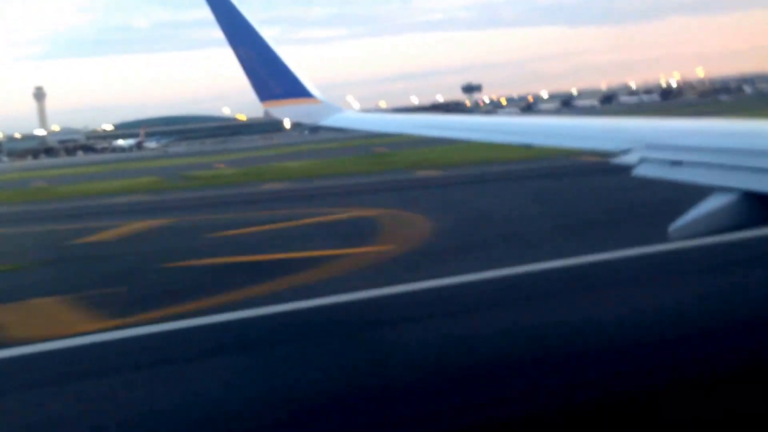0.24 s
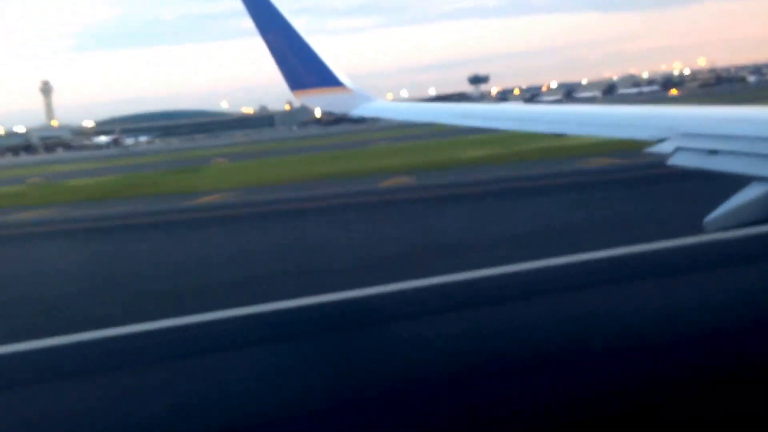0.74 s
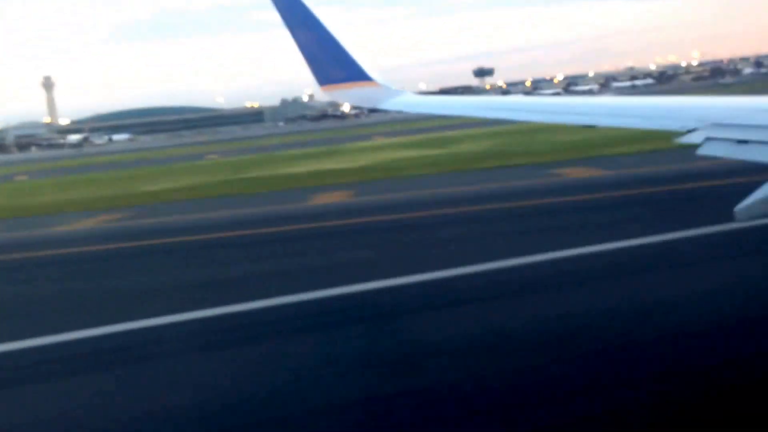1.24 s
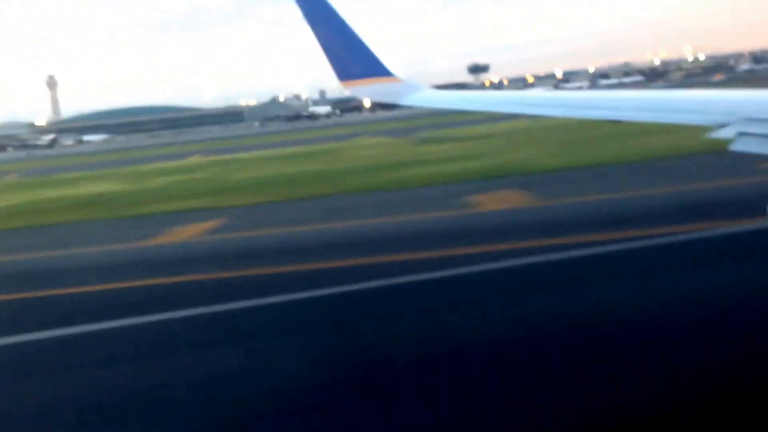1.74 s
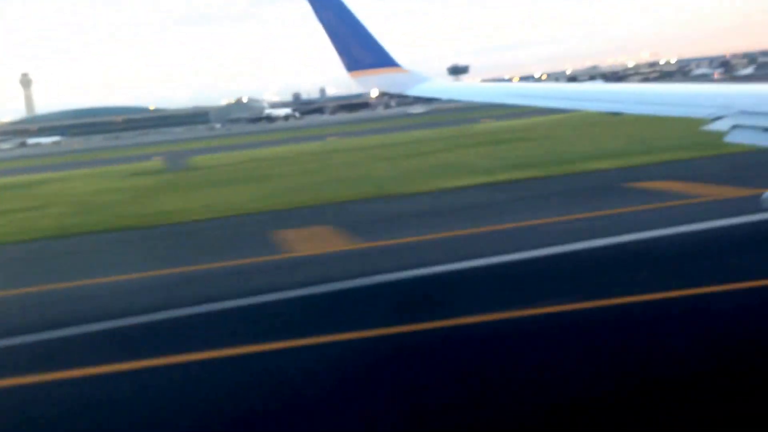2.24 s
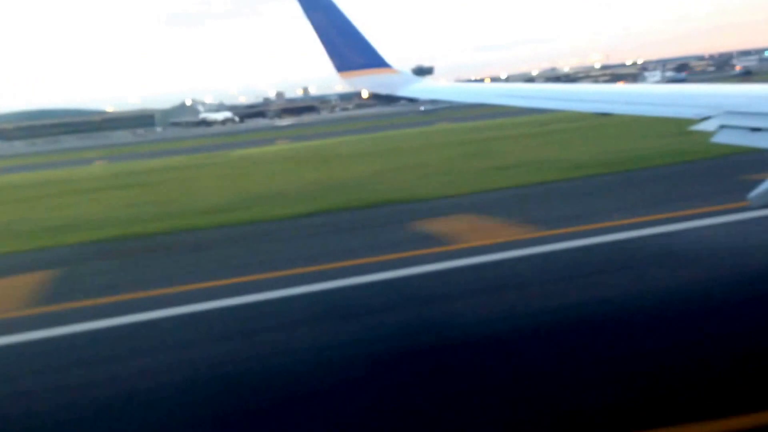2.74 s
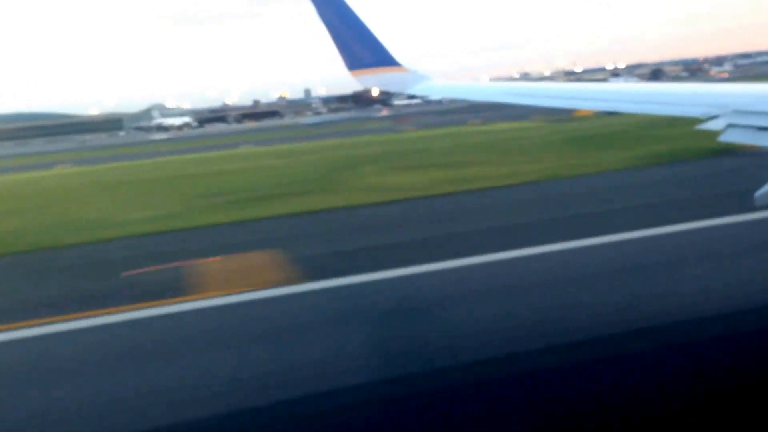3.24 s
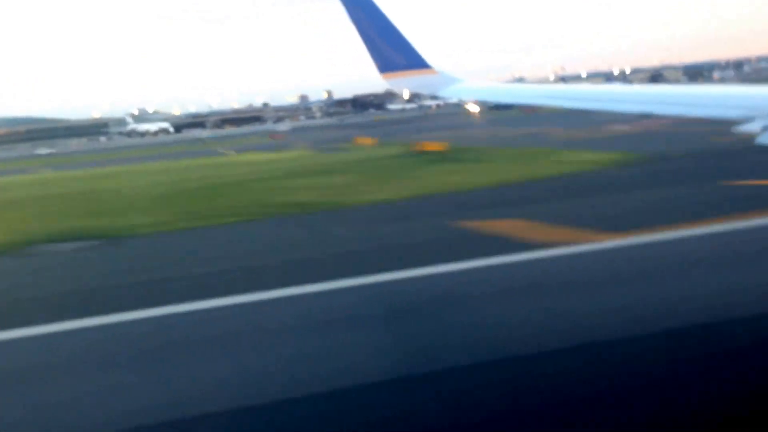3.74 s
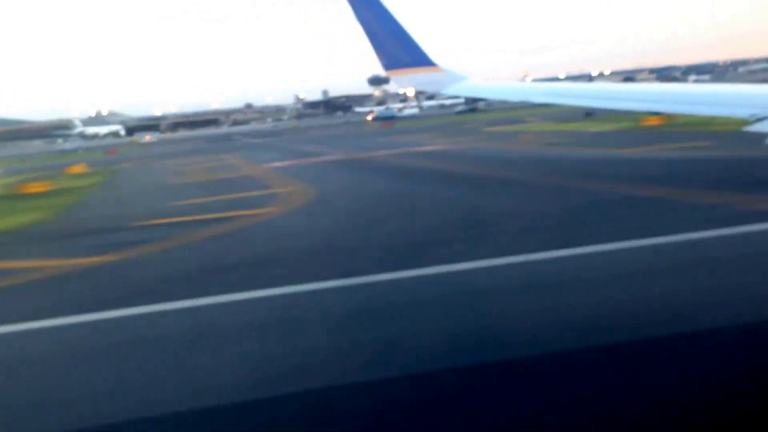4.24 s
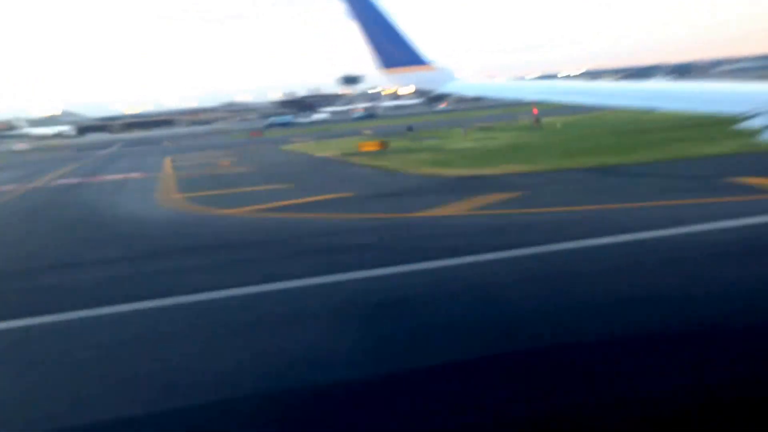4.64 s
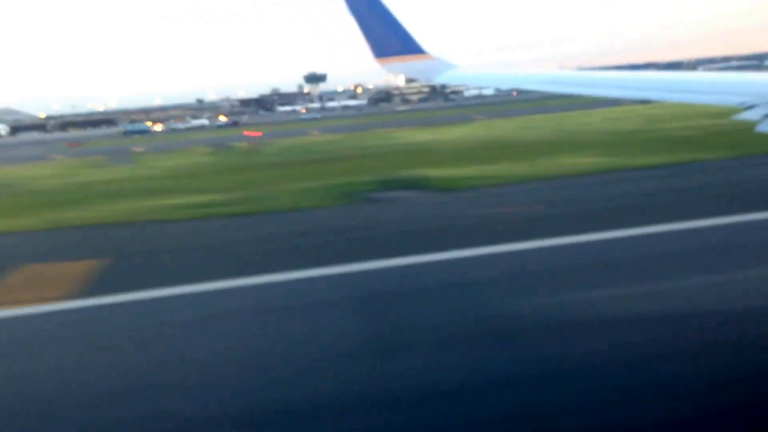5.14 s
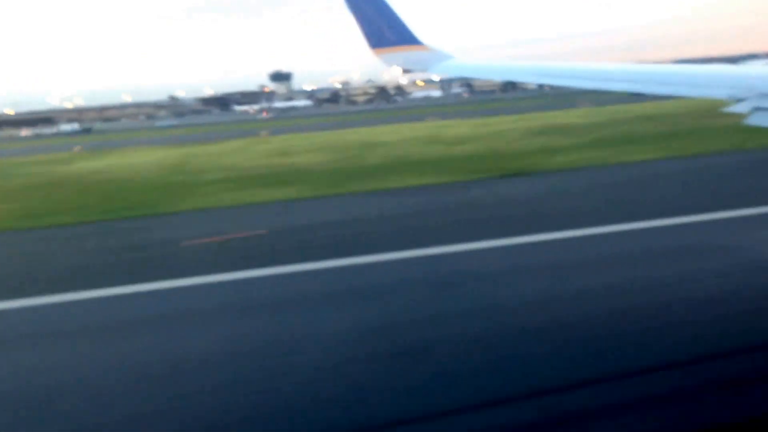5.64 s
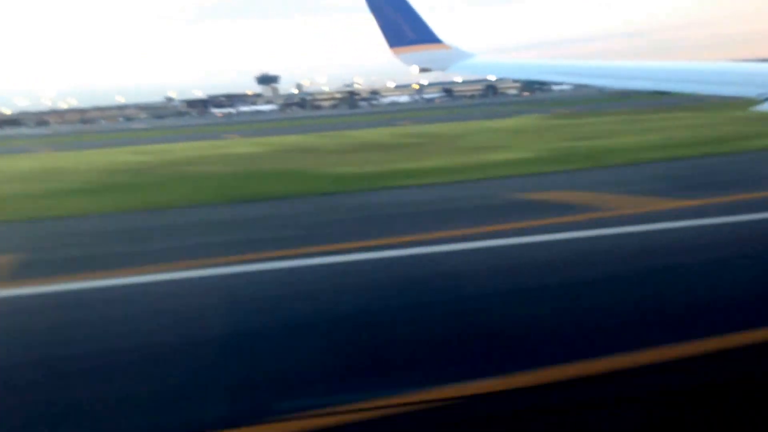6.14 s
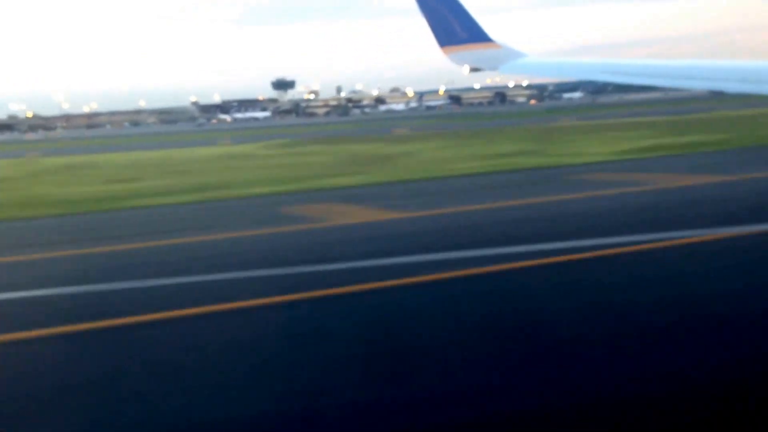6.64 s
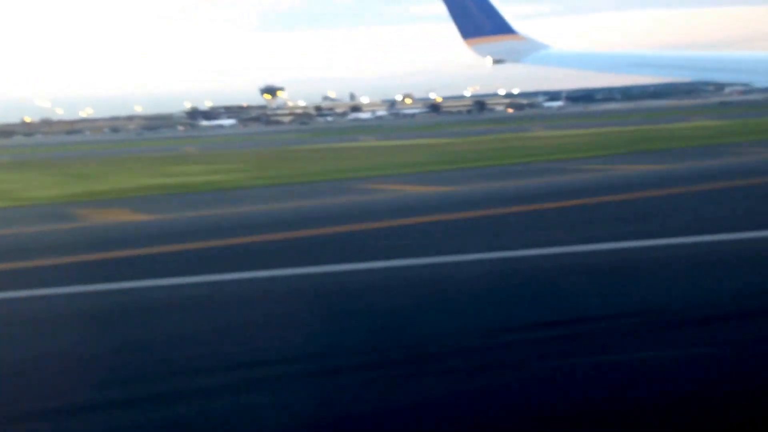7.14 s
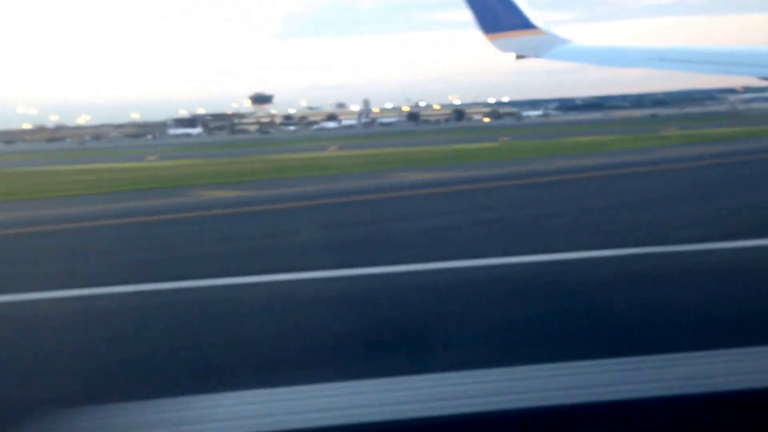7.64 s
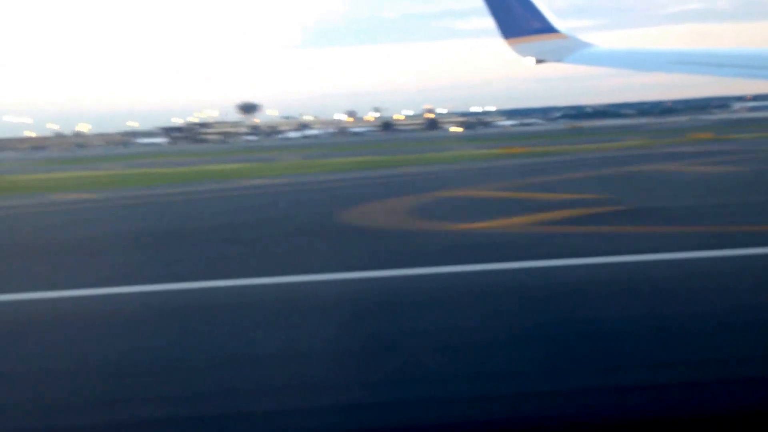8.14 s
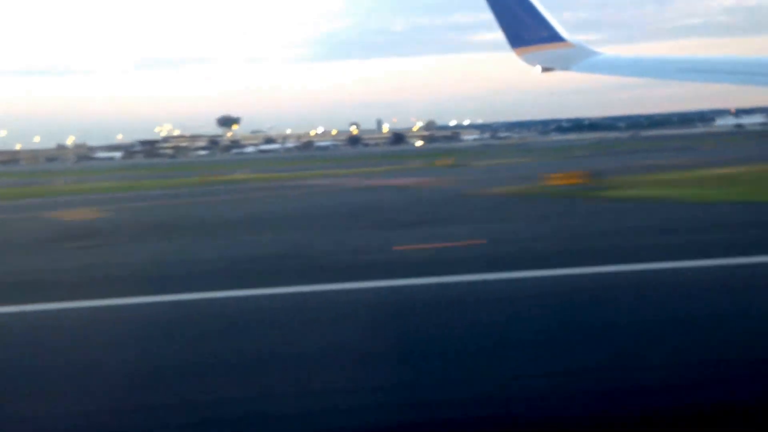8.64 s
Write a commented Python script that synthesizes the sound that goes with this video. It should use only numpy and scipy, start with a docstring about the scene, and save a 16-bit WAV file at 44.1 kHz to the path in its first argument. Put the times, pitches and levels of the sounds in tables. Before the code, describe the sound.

Inside an airliner cabin speeding down the runway, a massive low rumble stays at full loudness throughout, fluttering unevenly. A hollow low-mid drone swells and fades inside it. Well beneath lies a thin trembling air hiss with buzzing plastic trim, short rattles, dry ticks and occasional woody knocks. Handheld microphone by the window, close walls, the loud low end squashed at its limit.

```python
"""A deep, fluttering rumble under a hiss of air: an airliner's takeoff roll from a window seat behind the wing.
Exhaust and wheel noise is filtered noise shaped by cabin resonances, with one resonance ringing as a sine.
The air is trembling noise; loose plastic trim chatters, rattles and ticks in short bursts of noise.
Knocks are damped sines with a noisy clack; a fast limiter holds the loud rumble at full scale."""
import sys
import numpy as np
from scipy import signal
from scipy.fft import rfft, irfft, next_fast_len
from scipy.io import wavfile
from scipy.ndimage import uniform_filter1d, minimum_filter1d, map_coordinates

SR = 44100
rng = np.random.default_rng(int(sys.argv[2]) if len(sys.argv) > 2 else 0)


def generate_wav(signal):
    """Clip the signal to [-1, 1] and save it as 16-bit WAV at the path in sys.argv[1]."""
    frames = np.transpose(np.atleast_2d(signal))
    scaled = np.clip(frames, -1, 1) * 32767
    pcm = np.round(scaled).astype(np.int16)
    wavfile.write(sys.argv[1], SR, pcm)


N = 392490
TOP_HZ = 15600  # upper band limit

# contact between trim panels: freq_hz, density_db (per Hz)
PLASTIC_SPECTRUM = [(400, -21.5), (1200, 4), (2600, 6), (3700, 0.5), (5300, -3), (6200, -5), (7600, -14),
                    (9500, -19.5), (15000, -26.5)]
# shaking of the cabin by airflow and runway: time_s, hiss_db, fizz_db (before each layer's trim)
SHAKE_LEVELS = [(0.0, -45, -67.5), (0.19, -50.5, -68.5), (0.34, -50, -72.5), (1.13, -48.5, -69.5),
                (1.43, -49, -72.5), (2.0, -47, -66.5), (2.59, -47, -69), (2.86, -50.5, -69.5),
                (3.35, -47.5, -71.5), (4.49, -48.5, -70.5), (4.98, -51, -72.5), (5.47, -47, -69.5),
                (6.01, -50, -66), (6.46, -48, -69), (7.64, -48, -65.5), (7.81, -50, -69.5),
                (8.23, -52.5, -69), (8.85, -50, -69)]


def amp(db):
    """Decibels to gain."""
    return 10 ** (np.asarray(db) / 20)


def unit(x):
    """x at rms 1."""
    return x / np.sqrt(np.mean(x ** 2) + 1e-20)


def along(points, hz):
    """(Hz, value) points interpolated on a log frequency axis."""
    point_hz, values = np.transpose(points)
    return np.interp(np.log(hz + 1), np.log(point_hz), values)


def curves(rows):
    """One value per sample for each column after the time."""
    time_s, *columns = np.transpose(rows)
    return [np.interp(np.arange(N) / SR, time_s, column) for column in columns]


def wobble(rate_hz):
    """Smooth random curve with rate_hz knots a second."""
    knots = rng.standard_normal(int(N * rate_hz / SR) + 4)
    return map_coordinates(knots, [np.arange(N) * rate_hz / SR], mode="nearest")


def filtered(x, response):
    """x filtered by a function of frequency."""
    size = next_fast_len(len(x) + 8192)  # padded for the filter's tail
    spectrum = rfft(x, size) * response(np.fft.rfftfreq(size, 1 / SR))
    return irfft(spectrum, size)[:len(x)]


def noise(response):
    """Noise of rms 1 with the given response."""
    return unit(filtered(rng.standard_normal(N), response))


def add(track, start_s, sound):
    """Mix a sound into the track at start_s."""
    part = track[max(round(start_s * SR), 0):][:len(sound)]
    part += sound[:len(part)]


def in_cabin(spectrum, hz):
    """Gain of a spectrum lifted by the cabin and panel resonances."""
    # centre_hz, width_hz (full, at half the dB lift), lift_db
    resonances = [(101, 28, 2.5), (129, 5.3, 1.5), (158, 18, 2.5), (334, 66, 2.5), (438.7, 65, 4.5),
                  (619, 77, 6.5), (800, 31, 5.5), (1517, 180, 4.5), (2050, 290, 0.5), (2500, 91, 2),
                  (2870, 140, 0.5), (3000, 97, 1), (3500, 150, 2)]
    lift_db = sum(db * 2 ** -(2 * (hz - centre) / width) ** 2 for centre, width, db in resonances)
    return amp(along(spectrum, hz) + lift_db)


def near_walls(x):
    """Quick echoes from hard surfaces close by comb the sound."""
    # window pane, wall and seat back: delay_s, level_db
    echoes = [(.0029, -21), (.0063, -19), (.0104, -19), (.0141, -22)]
    return filtered(x, lambda hz: 1 + sum(
        amp(db) * np.exp(-2j * np.pi * hz * delay_s) for delay_s, db in echoes))


def air(jolts, air_db=-0.5, sheen_db=-14, sheen_fade_db_per_s=0.9, fizz_db=-3, tremble_db=1.7, jolt_db=1.5):
    """Hiss of the airflow, trembling with the airframe, with a fading sheen and a fine fizz on top."""
    # air along the skin and from the vents: freq_hz, density_db (per Hz)
    air_spectrum = [(300, -22.5), (900, 0.5), (1300, -2.5), (2100, 3.5), (3100, -6), (4500, -6.5),
                    (5200, -12), (6000, -23.5), (7400, -40), (15000, -57.5)]
    sheen_spectrum = [(4400, -37), (5400, 3.0), (6100, 0.0), (6900, -4), (7600, -17.0), (9000, -46.0)]
    fizz_spectrum = [(5000, -24.5), (7400, 1.5), (8700, 4.0), (11000, -4.5), (15000, -8.0)]
    hiss_level_db, fizz_level_db = curves(SHAKE_LEVELS)
    sheen_level_db = hiss_level_db - sheen_fade_db_per_s * np.arange(N) / SR
    hiss = amp(hiss_level_db + air_db) * noise(lambda hz: in_cabin(air_spectrum, hz))
    sheen = amp(sheen_level_db + sheen_db) * noise(lambda hz: amp(along(sheen_spectrum, hz)))
    fizz_noise = noise(lambda hz: amp(along(fizz_spectrum, hz)) * (hz < TOP_HZ))
    fizz = amp(fizz_level_db + fizz_db) * fizz_noise
    return (hiss + sheen + fizz) * amp(tremble_db * wobble(45) + jolt_db * jolts)


def contact_noise(contacts, t60_s):
    """White noise set off by each contact, falling 60 dB in t60_s."""
    t = np.arange(SR // 20) / SR
    energy = np.abs(signal.fftconvolve(contacts ** 2, amp(-60 * t / t60_s) ** 2)[:N])
    return np.sqrt(energy) * rng.standard_normal(N)


def buzz(rate_hz, range_db=24, clump_db=4, t60_s=0.0071):
    """Trim panels buzz against each other: many tiny contacts of uneven strength, in bunches; rms 1."""
    play = np.tanh(wobble(45))  # the panels have only so much play
    contacts = (rng.random(N) < rate_hz / SR) * amp(-range_db * rng.random(N) + clump_db * play)
    return unit(filtered(contact_noise(contacts, t60_s), lambda hz: in_cabin(PLASTIC_SPECTRUM, hz)))


def chatter(jolts, chatter_db=-7, jolt_db=1.5):
    """Steady trim buzz whose level follows the shaking and the runway's small jolts."""
    level_db, _ = curves(SHAKE_LEVELS)
    return amp(level_db + chatter_db + jolt_db * jolts) * buzz(rate_hz=380)


def rattles(rattle_db=-2.5):
    """A hard jolt sets the loose trim buzzing more densely in a burst that swells and dies."""
    # peak_s, length_s (peak to e^-2 in amplitude), level_db (before trim)
    bursts = [(0.163, 0.092, -43.5), (0.668, .08, -45.5), (0.774, 0.017, -41.5), (0.846, .06, -42.5),
              (0.971, .04, -43.5), (1.097, .07, -46.5), (1.225, 0.036, -43.5), (1.71, .06, -46.5),
              (2.083, .11, -48), (2.434, 0.037, -44.5), (2.513, .06, -44), (2.738, .08, -45),
              (3.175, .04, -46.5), (3.395, 0.074, -40.5), (3.746, 0.032, -44), (3.92, .07, -45),
              (4.086, .05, -45.5), (4.41, 0.051, -48), (4.562, 0.054, -46.5), (4.902, .05, -46),
              (5.32, .07, -44), (6.175, 0.055, -46), (7.06, 0.089, -45.5), (7.393, .05, -47),
              (7.493, 0.036, -47)]
    t = np.arange(N) / SR
    swell = sum(amp(db) * np.exp(-2 * ((t - peak_s) / length_s) ** 2) for peak_s, length_s, db in bursts)
    return amp(rattle_db) * swell * buzz(rate_hz=900)


def crackle(jolts, rate_hz=45, range_db=12, jolt_db=2, t60_s=.008, crackle_db=-10):
    """Single sharp contacts of small loose parts, stronger on the jolts."""
    # small hard contact: freq_hz, density_db (per Hz)
    contact_spectrum = [(500, -8.5), (2200, 3), (5500, -3), (8000, -13.5), (15000, -20.5)]
    level_db, _ = curves(SHAKE_LEVELS)
    contacts = (rng.random(N) < rate_hz / SR) * amp(-range_db * rng.random(N) + jolt_db * jolts)
    sharp = filtered(contact_noise(contacts, t60_s), lambda hz: amp(along(contact_spectrum, hz)))
    return amp(level_db + crackle_db) * unit(sharp)


def ticks(build_s=.002, fall_s=0.0011, rub=.08, rub_width_s=0.0046, tick_db=-2.0, snap_db=9):
    """A panel edge rubs, then slips with a bright snap."""
    # start_s, body_db, snap_db (levels before trim)
    slips = [(0.069, -41, -47.5), (0.1687, -30, -62.5), (0.646, -31.5, -60), (0.778, -29.5, -55.5),
             (0.817, -35, -45.5), (0.83, -30.5, -50), (0.8424, -26, -53.5), (0.858, -34.5, -48),
             (1.0855, -29, -43), (1.198, -38, -56.5), (1.2142, -27, -46.5), (1.707, -27.5, -50.5),
             (1.9713, -30.5, -43.5), (2.0356, -29, -52), (2.1015, -29.5, -54.5), (2.2745, -27.5, -48),
             (2.5229, -33, -60), (2.7399, -32, -60), (3.3532, -26.5, -53.5), (3.4013, -26.5, -49.5),
             (3.4263, -28, -53.5), (3.4412, -27.5, -53.5), (3.639, -32, -57), (3.741, -34, -63.5),
             (4.4056, -31, -57), (5.297, -30, -47), (5.312, -28.5, -48.5), (5.4671, -29, -49),
             (6.055, -35, -47.5), (6.1755, -33, -53.5), (7.498, -30, -55), (7.8005, -29.5, -52.5),
             (7.8271, -28.5, -45), (8.1413, -29, -48), (8.2908, -35.5, -58)]
    # bright edge of a tick: freq_hz, density_db (per Hz)
    snap_spectrum = [(2000, -6.5), (6000, 3.5), (9000, -2), (15000, -8.5)]
    body, snap = np.zeros(N), np.zeros(N)
    t = np.arange(-SR // 50, SR // 50) / SR
    slip = np.exp(np.where(t < 0, 4 * t, -t) / fall_s)  # rises four times faster than it falls
    rubbing = rub * np.exp(-np.abs(t) / rub_width_s)
    for start_s, body_db, bright_db in slips:
        add(body, start_s + build_s + t[0], amp(body_db + tick_db) * (slip + rubbing))
        add(snap, start_s + build_s + t[0], amp(bright_db + snap_db) * slip)
    bright = noise(lambda hz: amp(along(snap_spectrum, hz)) * (hz < TOP_HZ))
    return body * noise(lambda hz: in_cabin(PLASTIC_SPECTRUM, hz)) + snap * bright


def knocks(t60_s=0.023, clack_db=6):
    """Bumps throw the cabin fittings against their stops: one damped note and a dry clack each."""
    # start_s, note_peak_db, pitch_hz, clack_db (before trim)
    hits = [(0.07, -17, 568, -27), (0.88, -15, 490, -40), (1.199, -19, 480, -36), (1.349, -19, 482, -33),
            (1.675, -11, 530, -43), (1.954, -19, 552, -35), (1.972, -18, 600, -40), (2.273, -18, 595, -34),
            (3.027, -14, 490, -34), (3.608, -14, 498, -39), (3.74, -16, 471, -31), (5.076, -21, 544, -31),
            (5.356, -19, 470, -36), (5.466, -12, 520, -40), (7.278, -21, 479, -33),
            (8.1415, -9.5, 585, -35), (8.293, -20, 501, -30), (8.722, -17, 565, -43)]
    # fitting hitting its stop: freq_hz, density_db (per Hz)
    clack_spectrum = [(400, -2.5), (850, 8), (1300, -1), (2500, -15), (6000, -28), (15000, -42)]
    notes, clack = np.zeros(N), np.zeros(N)
    t = np.arange(SR // 10) / SR
    onset = 1 - np.exp(-(t / .0014) ** 2)
    burst = onset * amp(-60 * t / .012)  # 12 ms t60
    for start_s, note_db, pitch_hz, hard_db in hits:
        note = onset * amp(-60 * t / t60_s) * np.sin(2 * np.pi * pitch_hz * t)
        add(notes, start_s, amp(note_db) * note / np.abs(note).max())
        add(clack, start_s, amp(hard_db + clack_db) * burst / burst.max())
    return notes + clack * noise(lambda hz: amp(along(clack_spectrum, hz)))


def drone(pitch_hz=337, drone_db=-0.5, swell_db=4.5):
    """The exhaust keeps one cabin resonance ringing: a sine that swells, flutters and drifts in pitch."""
    # slow swells: time_s, level_db (before trim and flutter)
    swells = [(0, -20.5), (.3, -28), (.8, -27.5), (1.17, -15.5), (1.35, -25), (1.95, -20), (2.48, -20),
              (2.62, -25.5), (3.4, -19.5), (4.0, -24), (5.68, -29), (5.8, -15), (5.92, -22), (6.45, -25),
              (6.93, -16), (7.25, -26), (7.9, -23.5), (8.85, -28.5)]
    level_db, = curves(swells)
    drift_hz = 17 * wobble(40)
    phase = 2 * np.pi * np.cumsum(pitch_hz + drift_hz) / SR
    return amp(level_db + drone_db + swell_db * np.tanh(wobble(20))) * unit(np.sin(phase))


def engines(split_hz=430, boom_db=-7.5, roar_db=-30.5, buffet_db=1.17, flutter_db=1.74):
    """Turbulent exhaust at steady thrust: a deep boom, and above it a roar fluttering with the jet's eddies."""
    # exhaust and wheel noise through the fuselage: freq_hz, density_db (per Hz)
    exhaust_spectrum = [(20, -27), (33, -30), (52, -11.5), (80, -12.5), (125, -5.5), (165, 0), (210, -2.5),
                        (270, -11.5), (345, -15), (400, -24.5), (540, -33.5), (730, -39), (1250, -51.5),
                        (2500, -85)]

    def low_share(hz):
        """Share of the power below the split."""
        return 1 / (1 + (hz / split_hz) ** 16)

    boom = noise(lambda hz: in_cabin(exhaust_spectrum, hz) * np.sqrt(low_share(hz)))
    roar = noise(lambda hz: in_cabin(exhaust_spectrum, hz) * np.sqrt(1 - low_share(hz)))
    boom_gain = amp(boom_db + buffet_db * wobble(16))
    roar_gain = amp(roar_db + flutter_db * wobble(50))
    return boom_gain * boom + roar_gain * roar


def scene():
    """Everything that reaches the window seat; the same runway jolts stir the hiss and the trim."""
    jolts = np.tanh(wobble(40))
    rumble = engines() + drone()
    echoed = near_walls(air(jolts) + chatter(jolts) + rattles())
    return (rumble + echoed + crackle(jolts) + ticks() + knocks())[None]


def limiter(x, hold_s=0.0011, ramp_s=0.0073):
    """Gain ducks smoothly just ahead of each peak that would pass full scale."""
    needed = 1 / np.maximum(np.abs(x), 1)
    width = max(int(ramp_s * SR), 1)
    gain = minimum_filter1d(needed, 2 * width + max(int(hold_s * SR), 1))
    return x * uniform_filter1d(uniform_filter1d(gain, width), width)


def record(dry):
    """Fade in over 2 ms, limit the peaks and cut everything from TOP_HZ up."""
    ease_in = np.minimum(np.arange(N) / (.002 * SR), 1)
    return filtered(limiter(dry[0] * ease_in), lambda hz: hz < TOP_HZ)[None]


dry = scene()
out = record(dry)
generate_wav(out)
```